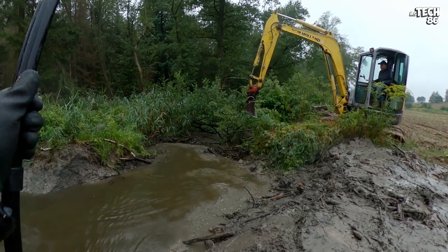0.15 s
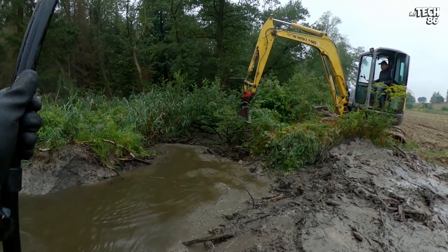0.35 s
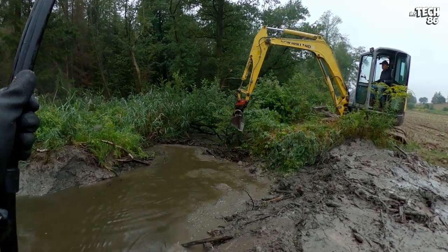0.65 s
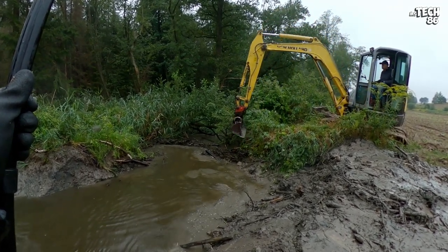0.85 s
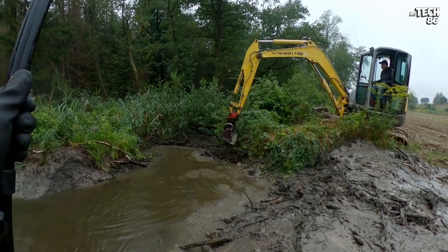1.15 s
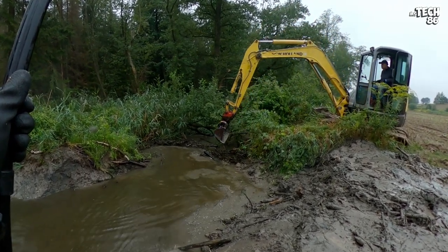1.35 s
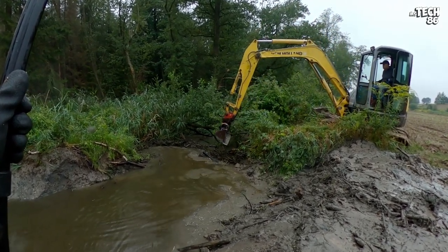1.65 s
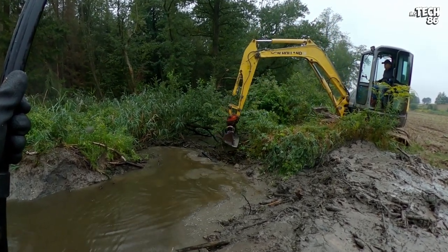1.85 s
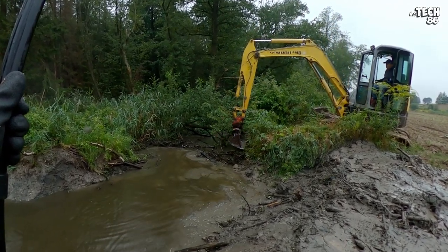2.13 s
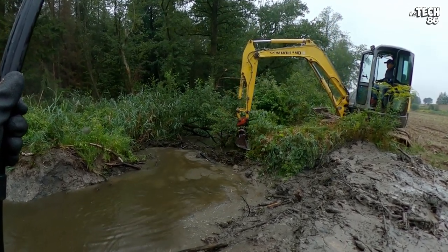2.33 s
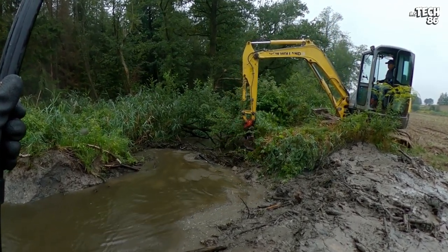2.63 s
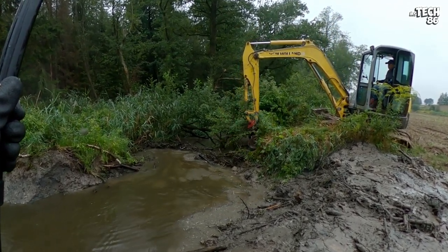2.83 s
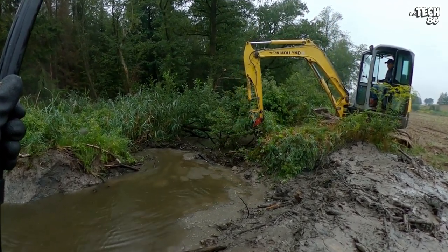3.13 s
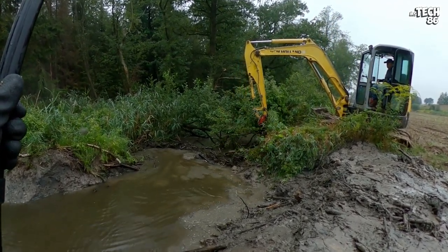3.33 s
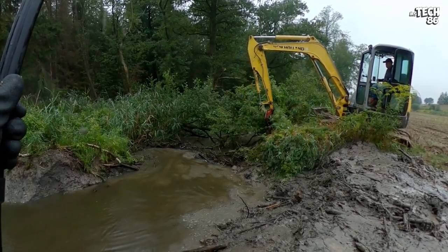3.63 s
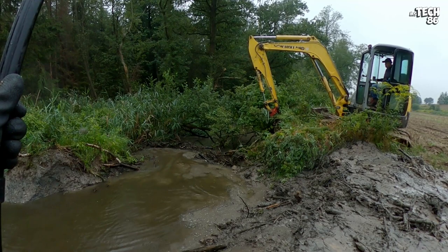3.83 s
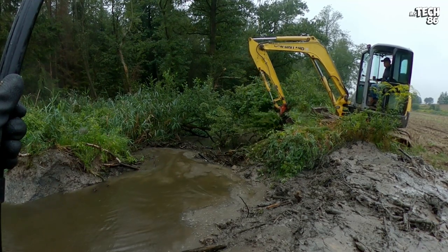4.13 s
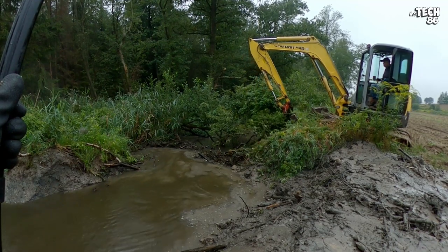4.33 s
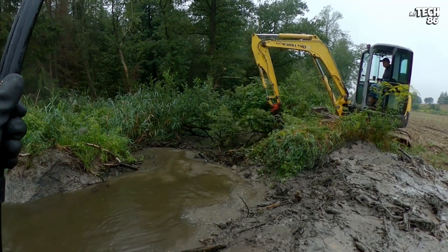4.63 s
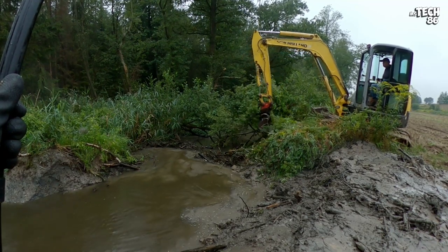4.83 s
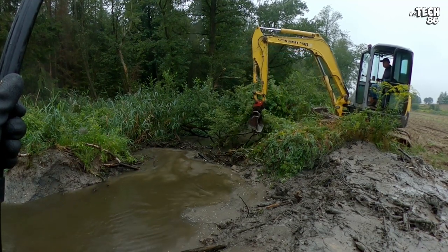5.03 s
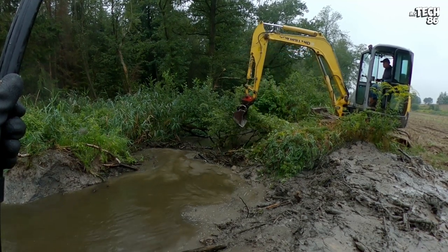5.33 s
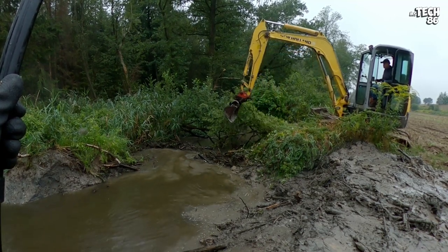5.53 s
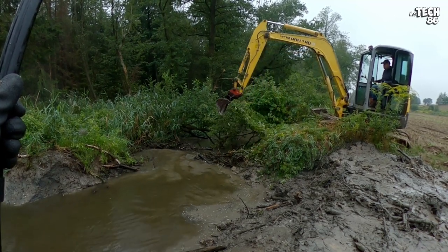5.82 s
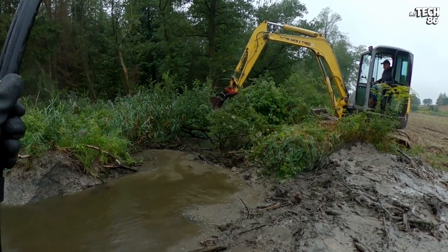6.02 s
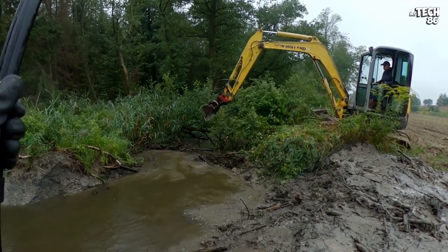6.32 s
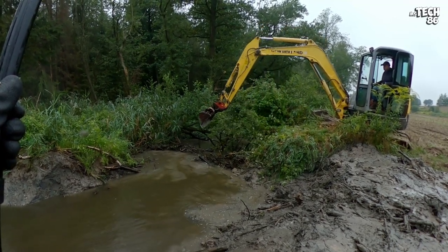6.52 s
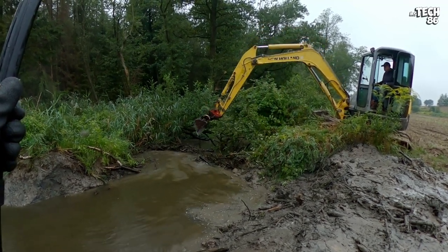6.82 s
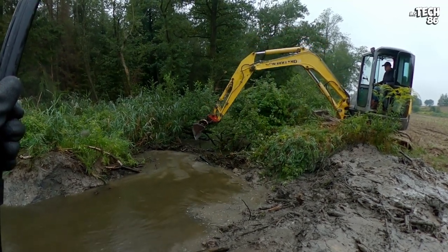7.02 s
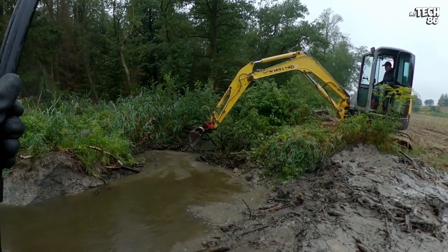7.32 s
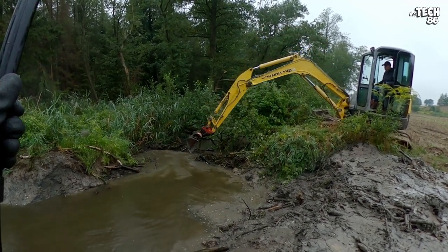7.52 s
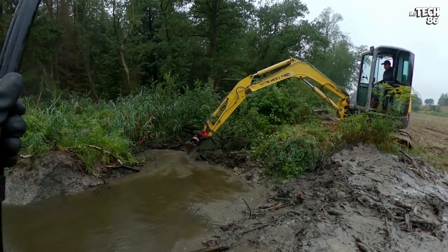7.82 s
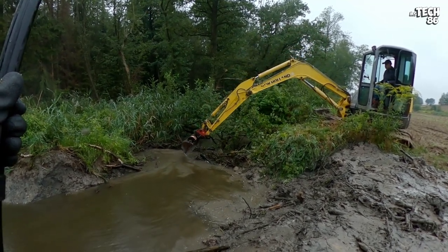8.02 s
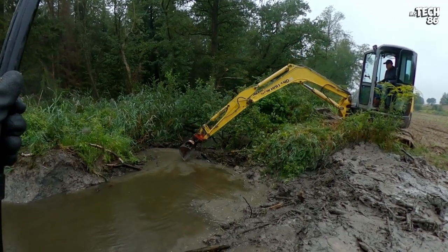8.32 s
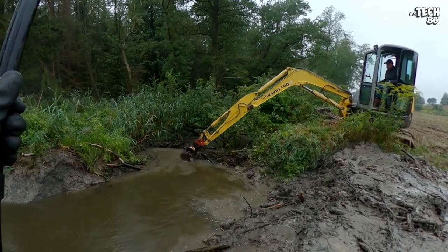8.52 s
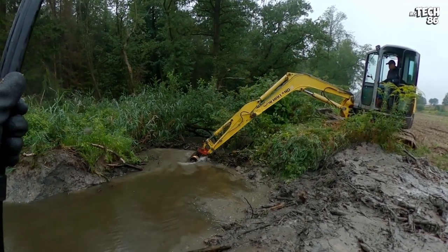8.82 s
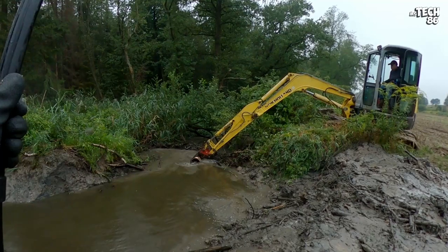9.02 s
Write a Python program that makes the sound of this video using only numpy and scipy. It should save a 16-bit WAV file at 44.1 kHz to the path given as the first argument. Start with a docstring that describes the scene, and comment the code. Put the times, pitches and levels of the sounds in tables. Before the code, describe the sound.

Outdoors on a muddy bank beside trees, a compact digger's diesel engine drones continuously with brief dips in speed. A fading metallic hum opens, then a dense run of hollow bucket knocks and bright branch snaps. Oil hiss and pump hum swell mid-way, followed by another hard clank group, sparse taps, one ringing clink, and a final rasp through roots. The microphone stands across the water at moderate distance; the stereo image is fairly narrow, with airy treble reflections.

```python
"""Edge of a wood by a muddy stream: a small diesel excavator digs at the bank.
Its four-cylinder engine drones at a firing rate that dips briefly; gear tones whine and throb.
Shaped noise gives the oil hiss in the valves, and sines the hum of the pump.
The steel bucket knocks in its pins (noise bursts into ringing modes), twigs snap in the brush,
a coupler clinks, and at last the bucket scrapes through soil and roots."""
import sys
import numpy as np
from scipy import signal
from scipy.fft import rfft, irfft, next_fast_len
from scipy.io import wavfile
from scipy.ndimage import uniform_filter1d

SR = 44100
rng = np.random.default_rng(int(sys.argv[2]) if len(sys.argv) > 2 else 0)


def log_audio(samples):
    """Write samples as a 16-bit WAV file to the path given in sys.argv[1]."""
    # one column per channel
    frames = np.atleast_2d(samples).T
    # limit to full scale, then quantise
    limited = np.clip(frames, -1, 1)
    pcm = np.round(limited * 32767).astype(np.int16)
    wavfile.write(sys.argv[1], SR, pcm)


N = 403956
TIME = np.arange(N) / SR
LEAK_DB = -54.5  # oil hiss with the valves shut


def from_db(db):
    """Amplitude ratio of a level in dB."""
    return np.exp(np.asarray(db) * np.log(10) / 20)


def rms_one(x):
    """Scales to rms 1."""
    return x / np.sqrt(np.mean(x ** 2) + 1e-20)


def in_time(rows):
    """Interpolates (time, level) rows to one level per sample."""
    s, level = np.transpose(rows)
    return np.interp(TIME, s, level)


def colour(x, outline):
    """Filters by a (Hz, dB) outline, falling away beyond its ends."""
    hz, db = np.transpose(outline)
    size = next_fast_len(N + 4096)
    f = np.maximum(np.fft.rfftfreq(size, 1 / SR), 1)
    skirts = np.minimum(f / hz[0], 1) ** 2 * np.minimum(hz[-1] / f, 1) ** 2
    gain = from_db(np.interp(np.log(f), np.log(hz), db)) * skirts
    return irfft(rfft(x, size) * gain, size)[:N]


def noise(outline):
    """Noise of rms 1, coloured by a (Hz, dB) outline."""
    return rms_one(colour(rng.standard_normal(N), outline))


def drift(rate_hz):
    """Random curve through rate_hz new normal values a second."""
    knots = rng.standard_normal(2 ** 15)
    return np.interp(TIME * rate_hz, np.arange(len(knots)), knots)


def resonance(x, hz, width_hz):
    """Two-pole resonance with gain 1 on top."""
    r = np.exp(-np.pi * width_hz / SR)
    zeros = np.array([1, 0, -1]) * (1 - r * r) / 2
    poles = [1, -2 * r * np.cos(2 * np.pi * hz / SR), r * r]
    return signal.lfilter(zeros, poles, x + 1e-18)


def double_resonance(x, hz, width_hz):
    """Two equal resonances in series, at rms 1."""
    return rms_one(resonance(resonance(x, hz, width_hz), hz, width_hz))


def bursts(times_s, levels_db, t60s, rise_s):
    """Envelope of blows that swell quickly and die away; their powers add."""
    power = np.zeros(N + SR)
    age = np.arange(SR) / SR
    for s, db, t60 in np.broadcast(times_s, levels_db, t60s):
        at = max(int(s * SR), 0)
        decay = from_db(db - 60 * age / max(t60, 1e-3))
        power[at:at + SR] += (decay * (1 - np.exp(-age / rise_s))) ** 2
    return np.sqrt(power[:N])


def swell(start_s, length_s):
    """A half sine that rises to 1 and falls back."""
    return np.sin(np.pi * np.clip((TIME - start_s) / length_s, 0, 1))


def throb(turns, depth, offset):
    """Level swing once per turn; rms 1."""
    return rms_one(np.exp(depth * np.cos(2 * np.pi * (turns - offset))))


def firing_rate():
    """Firings per second: a slow course with brief dips of the firing rate, each followed by a rise."""
    # course without the dips: (time [s], firing rate [Hz])
    course = [(0, 51.3), (.64, 50.6), (.81, 52.7), (1, 51.4), (2.46, 51.9), (3.2, 49.0), (3.87, 50.8),
              (4.35, 50.4), (4.43, 51.5), (5.3, 49.45), (6, 50.9), (6.1, 50.5), (9.16, 50.5)]
    # dips: (start [s], length [s], depth before smoothing [Hz])
    dips = [(.93, .15, 3.2), (1.11, .35, 2.5), (1.69, .26, 1.4), (4.54, .26, 1.5), (7.75, .29, 1.0),
            (8.43, .46, 3.1)]
    rise_per_s, rise_length_s = 1.85, .23  # share of the depth per second of dip; duration
    hz = in_time(course)
    for s, length, depth_hz in dips:
        rise = rise_per_s * length * swell(s + length, rise_length_s)
        hz = hz + depth_hz * (rise - swell(s, length))
    return uniform_filter1d(hz, size=SR // 16)  # the flywheel evens out the speed


def exhaust(firings, effort):
    """A clean drone at the firing rate, wavering overtones, and a rough puff at every firing."""
    # overtones: (multiple of firing rate [1], level relative to bark [dB])
    overtones = [(2, -0.5), (2.5, -15.5), (3, -2.5), (3.5, -13.5), (4, -12), (4.5, -24.5), (5, -16.5),
                 (6, -32), (7.5, -20), (8.5, -23), (9, -25), (10, -28.5), (11, -34), (12.5, -29), (15, -38),
                 (20, -33.5), (22.5, -31.5), (27.5, -52), (30, -37), (32.5, -36)]
    # puff colour: (frequency [Hz], relative level [dB])
    rumble = [(45, -4), (75, -5.5), (120, -5), (185, 0.5), (240, -3.5), (300, -14.5), (440, -14),
              (600, -26), (1000, -44)]
    # puff level: (time [s], level [dB])
    rumble_level = [(0, -24), (.3, -32.5), (.7, -27.5), (1.3, -34.5), (1.7, -25.5), (2.6, -32.5),
                    (5.5, -32), (6, -27), (7, -32), (8.3, -31), (8.8, -26)]
    # level at cruising speed, plus the change at full effort
    drone_db, bark_db = -22.9 + 1.7 * effort, -29 + 3 * effort
    drone = from_db(drone_db) * np.sqrt(2) * np.sin(2 * np.pi * firings)
    bark = 0
    for multiple, db in overtones:
        order = np.round(2 * multiple) / 2  # whole or half orders only
        tone = np.sin(2 * np.pi * (order * firings + rng.random()))
        bark = bark + from_db(db + 0.37 * drift(9)) * tone
    puffs = noise(rumble) * throb(firings, depth=0.33, offset=0.14)
    return drone + from_db(bark_db) * np.sqrt(2) * bark + from_db(in_time(rumble_level)) * puffs


def block(firings, hiss_db, repeat_db=-1.5):
    """Injectors and valves rattle; part of the pattern comes round again every four firings."""
    # rattle colour: (frequency [Hz], relative level [dB])
    clatter = [(300, 8.5), (500, 11), (800, 3), (1200, 3.5), (1900, 9), (2600, -0.5), (3500, -2),
               (4800, -22), (6300, -21), (8300, -23), (9700, -14.5), (14000, -64)]
    clatter_db = -44.5 + 0.1 * (hiss_db - LEAK_DB)  # a tenth of the oil hiss's swing
    cycle = rng.standard_normal(3500)
    repeating = rms_one(np.interp(firings / 4 % 1, np.linspace(0, 1, len(cycle)), cycle))
    rattle = from_db(repeat_db) * repeating + rng.standard_normal(N)
    rattle = rattle * throb(2 * firings, depth=0.27, offset=0.25)
    return from_db(clatter_db) * rms_one(colour(rattle, clatter))


def gears(firings, firing_hz, mesh_db=-0.5):
    """The casing favours gear tones near its pitch; the load swings once per engine cycle."""
    # whine: (time [s], level before the mesh_db trim [dB])
    whine_level = [(0, -45.5), (.55, -44.5), (2.85, -45.5), (3.05, -52), (5.3, -53.5), (6.5, -46),
                   (8.3, -45), (8.7, -50), (9, -43)]
    casing_hz, casing_width_hz = 1775, 41
    mesh = 0
    for order in range(32, 39):
        detuning = (order * firing_hz - casing_hz) / (casing_width_hz / 2)
        mesh = mesh + np.sqrt(2 / (1 + detuning ** 4)) * np.sin(2 * np.pi * order * firings)
    casing = .55 * double_resonance(rng.standard_normal(N), 1870, 380)
    swing = rms_one(1 + .65 * np.cos(2 * np.pi * (firings / 4 - .9)))
    return from_db(in_time(whine_level) + mesh_db) * swing * (mesh + casing)


def valves():
    """Hiss in dB: a valve opens quickly, pressure builds through the stroke, and the flow dies as it shuts."""
    # arm strokes: (opens [s], closes [s], hiss before pressure builds [dB])
    strokes = [(2.38, 4.38, -51), (4.727, 5.052, -49), (5.058, 5.62, -44), (8.55, 8.82, -46.5)]
    open_s, close_s, pressure_db_per_s = 0.049, 0.22, 3.5
    power = from_db(LEAK_DB) ** 2
    for opens, closes, db in strokes:
        held = np.clip(TIME - opens, 0, closes - opens)
        shut = np.maximum(TIME - closes, 0)
        flow = (1 - np.exp(-held / open_s)) * np.exp(-shut / close_s)
        power = power + (from_db(db + pressure_db_per_s * held) * flow) ** 2
    return 10 * np.log10(power)


def hydraulics(hiss_db):
    """Oil squeezes through the control valves as wavering, coloured noise."""
    # hiss colour: (frequency [Hz], relative level [dB])
    oil = [(900, -10), (2000, 5.5), (3300, 5), (4800, 0), (6400, 3.5), (8300, -6.5), (10000, -9),
           (12000, -24.5), (14000, -24), (16000, -44)]
    return from_db(hiss_db + 1.8 * drift(40)) * noise(oil)


def pump(firings, hiss_db):
    """The pump's pistons hum in step with the engine, as loud as the oil flow makes them."""
    # piston tones: (multiple of firing rate [1], level relative to hiss [dB])
    piston_tones = [(10, -5), (20, -9)]
    out = 0
    for order, db in piston_tones:
        tone = np.sin(2 * np.pi * np.round(order) * firings)
        out = out + from_db(hiss_db + db + 1.5 * drift(4.5)) * tone
    return out


def arm_hum():
    """The arm still hums from an earlier blow: a few modes fade out."""
    # arm modes: (frequency [Hz], level at the start [dB], t60 [s])
    hum_modes = [(261, -22.5, 1.0), (481.3, -33, .6), (815, -37.5, 0.18), (1248, -37, 0.24)]
    out = 0
    for hz, db, t60 in hum_modes:
        out = out + from_db(db - 60 * np.minimum(TIME / t60, 3)) * np.sin(2 * np.pi * hz * TIME)
    return out


def twigs():
    """Each break is a brief, bright crack of splintering fibres; small stems tick and leaves rustle."""
    # twigs and roots snapping: (time [s], burst level [dB], pitch [Hz])
    snaps = [(0.204, -39, 5900), (.399, -36, 5170), (.729, -17, 5700), (1.435, -18.5, 3750),
             (1.768, -16, 4130), (2.785, -24.5, 6400), (2.81, -29.5, 6090), (3.437, -25, 3430),
             (4.806, -23, 3730), (5.110, -25.5, 6560), (5.177, -22, 5870), (5.57, -30.5, 3500),
             (8.159, -33, 6350), (8.827, -14, 3640), (8.890, -39, 3570)]
    ticks_per_s, tick_db, tick_spread_db = 2.6, -51, 0.5  # small stems giving way
    fibres = noise([(1500, 18.0), (3000, 12.5), (7000, 4.5), (10500, -4.5), (15000, -24)])
    fibres = fibres * from_db(3.5 * drift(900))
    # a bush springs back
    out = bursts([0.706], -39.5, 0.68, rise_s=.008) * double_resonance(fibres, 6000, 2500)
    for s, db, hz in snaps:
        out += bursts(s, db, 0.05, rise_s=0.001) * rms_one(resonance(fibres, hz, 3600))
    times = np.cumsum(rng.exponential(1, size=64)) / ticks_per_s
    times = times[times < TIME[-1]]
    levels_db = tick_db + tick_spread_db * rng.standard_normal(len(times))
    ticks = bursts(times, levels_db, .025, rise_s=.001)
    return out + ticks * rms_one(resonance(fibres, 7500, 3000))


def own_rings(times_s, levels_db, pitches_hz, t60_s=0.074):
    """Each blow lands on another spot and favours a ring of its own: narrow-band decaying noise."""
    out = np.zeros(N + SR)
    age = np.arange(SR // 2) / SR
    for at, db, hz in zip((times_s * SR).astype(int), levels_db, pitches_hz):
        narrow = resonance(rng.standard_normal(len(age)), hz, 0.13 * hz)
        ring = rms_one(resonance(narrow, hz, 0.51 * hz))
        out[at:at + len(age)] += ring * from_db(db - 60 * age / t60_s) * (1 - np.exp(-age / 0.0013))
    return out[:N]


def bucket(contact_db=-2.2, ring_db=5.5, chatter_db=3.5):
    """Loose pins chatter at each blow; lows last longer, and contact noise excites the steel's modes."""
    # knocks: (time [s], clang [dB], crack [dB], strongest ring [Hz]), levels before contact_db
    knocks = [(.714, -15, -25, 3200), (.728, -30, -36, 1650), (.849, -16, -16, 2930),
              (.908, -12, -19, 2150), (.944, -18, -25.5, 2240), (.964, -16.5, -41, 846),
              (1.048, -20.5, -34, 1910), (1.157, -21, -55, 1020), (1.225, -19.5, -57, 2100),
              (1.391, -14.5, -29, 1590), (1.418, -16, -21.5, 2430), (1.436, -17.5, -22.5, 714),
              (1.548, -16, -16.5, 1660), (1.588, -20.5, -40, 1900), (1.612, -15, -22, 680),
              (1.742, -21, -27, 1940), (1.757, -13.5, -17.5, 910), (1.884, -27, -30, 1130),
              (1.973, -13, -25.5, 1760), (1.991, -19.5, -32, 770), (2.176, -29.5, -47, 2300),
              (2.772, -24.5, -30, 2300), (3.147, -31.5, -47, 740), (3.354, -31, -41, 703),
              (4.354, -19, -28, 1210), (4.376, -14, -15, 2840), (4.406, -11.5, -15, 1880),
              (4.567, -21, -25, 2200), (4.78, -19.5, -26, 1320), (4.962, -22.5, -24.5, 3100),
              (5.091, -28.5, -31.5, 1310), (5.878, -22.5, -34, 2780), (6.756, -29.5, -55, 1090),
              (7.927, -28.5, -50, 1570), (8.462, -25.5, -33.5, 690), (8.499, -23, -42, 840),
              (8.765, -27.5, -29, 2390), (8.824, -18, -21, 2870), (8.911, -26, -28.5, 1420)]
    # bucket and arm modes: (frequency [Hz], gain before ring_db [dB], t60 [s])
    steel_modes = [(203.1, 5.5, 0.2), (240, -10, 0.53), (320.4, -7, 0.28), (363, 1, 0.5), (451, -13, 0.41),
                   (488, -5.5, 0.43), (686, -3.5, 0.16), (775, -1.5, 0.42), (947, -1, 1), (1032, 1.5, 0.28),
                   (1186, -1, 0.82), (1444, -13, 0.1), (1566, -10, 0.12), (1770, 3, 0.24),
                   (2200, -32, 0.29), (2320, -12, 0.18), (2760, -10, 0.11), (2900, 0.5, 0.041),
                   (3660, -19, 0.14), (3780, -8, 0.06), (4350, -12, 0.13)]
    # contact colours, each: (frequency [Hz], relative level [dB])
    thud_colour = [(120, -1), (200, 4), (300, 5), (460, 9), (700, -15), (1100, -10)]
    clang_colour = [(450, 7), (800, 9), (1200, 4.5), (1800, 6.5), (2700, -2.5), (3600, -14.5), (5000, -51)]
    crack_colour = [(2200, 13.5), (3600, 12), (5000, -0.5), (6800, -2.5), (8500, -16.5), (10500, -22),
                    (12500, -63), (16000, -38)]
    thud_db, own_ring_db = -1.5, -4.5  # relative to the clang
    light_tap_db, thud_loss_per_db = -25, 3  # lighter taps hardly shake the arm
    rebound_within_s, rebound_thud_db = .03, -4.5  # a rebound has less weight behind it
    lead_s, lead_db = 0.0094, -8  # a fainter touch 9 ms before each blow softens its onset

    s, clang_db, crack_db, ring_hz = np.transpose(knocks)
    thud_db = clang_db + thud_db - thud_loss_per_db * np.maximum(light_tap_db - clang_db, 0)
    thud_db = thud_db + rebound_thud_db * (np.diff(s, prepend=0) < rebound_within_s)
    touches, touch_db = np.r_[s, s - lead_s], np.r_[clang_db, clang_db + lead_db]
    chatter = rms_one(from_db(chatter_db * drift(450)))
    thud = bursts(s, thud_db, .25, rise_s=0.0041) * noise(thud_colour)
    clang = bursts(touches, touch_db, 0.13, rise_s=0.0068) * noise(clang_colour) * chatter
    crack = bursts(s, crack_db, 0.087, rise_s=0.002) * noise(crack_colour) * chatter
    contact = thud + clang + crack
    rings = 0
    for k, (hz, db, t60) in enumerate(steel_modes):
        share = from_db(db + 1.06 * drift(4.4))  # mode weights wander from blow to blow
        width_hz = np.log(1000) / (np.pi * t60)
        rings = rings + resonance(contact * share, hz, width_hz) * (-1) ** k
    spot_rings = own_rings(s, clang_db + own_ring_db, ring_hz)
    return from_db(contact_db) * contact + from_db(ring_db) * rings + spot_rings


def coupler(ring_db=-2.5):
    """The coupler clinks against its stop: a short steel chatter that leaves a clear ring."""
    # clinks: (time [s], burst level [dB])
    clinks = [(6.265, -17.5), (6.279, -22), (6.298, -30)]
    # contact colour: (frequency [Hz], relative level [dB])
    clink_colour = [(500, -13), (1100, -10), (1450, 2.5), (1900, -8), (2600, -6), (3300, -13),
                    (4300, -21.5), (7000, -41)]
    # modes: (frequency [Hz], level relative to clink before ring_db [dB], t60 before t60_scale [s])
    coupler_modes = [(670, -18, 0.39), (750, -21, 0.65), (1251, -14, 0.36), (1586, 2, 0.16),
                     (2224, -10, 0.14), (2570, -8, 0.17), (2930, -10, 0.1)]
    t60_scale = 0.81
    s, db = np.transpose(clinks)
    contact = bursts(s, db, 0.095, rise_s=0.0017) * noise(clink_colour)
    rings = 0
    for hz, mode_db, t60 in coupler_modes:
        tone = np.sin(2 * np.pi * (hz * TIME + rng.random()))
        rings = rings + bursts(s, db + mode_db, t60_scale * t60, rise_s=0.0022) * tone
    return contact + from_db(ring_db) * rings


def scrape(grain_db=1.0):
    """Soil and roots tear in uneven grains, and the steel rasps over them in narrow, rough bands."""
    # bucket dragging: (time [s], level [dB])
    drag_level = [(8.42, -64), (8.5, -46), (8.58, -39.5), (8.7, -37.5), (8.8, -44), (8.9, -58), (9.0, -73)]
    # soil colour: (frequency [Hz], relative level [dB])
    soil = [(300, -5), (900, -4), (2000, 3), (2600, 2), (4200, 1), (6500, -6.5), (10000, -17), (15000, -52)]
    # steel rasping over roots: (start [s], length [s], pitch [Hz], level [dB])
    squeaks = [(8.565, 0.045, 2450, -35), (8.565, 0.027, 4050, -36), (9.2, 0.26, 2290, -42.5),
               (8.69, .092, 4100, -42)]
    dragging = (TIME > drag_level[0][0]) & (TIME < drag_level[-1][0])
    out = dragging * from_db(in_time(drag_level) + grain_db * drift(150)) * noise(soil)
    slips = rng.standard_normal(N)
    for s, length, hz, db in squeaks:
        rasp = rms_one(resonance(resonance(slips, hz, .07 * hz), hz, .6 * hz))
        out += from_db(db) * swell(s, length) * rasp
    return out


def woods(x, t60_s=0.38, dull_hz=3200):
    """Trunks and leaves scatter a dull tail: decaying, low-passed noise as an echo."""
    age = np.arange(SR) / SR
    scatter = rng.standard_normal(SR) * from_db(-60 * age / t60_s) * (1 - np.exp(-age / 0.004))
    scatter = scatter / np.sqrt(np.sum(scatter ** 2))
    scatter = signal.sosfilt(signal.butter(2, dull_hz, fs=SR, output="sos"), scatter)
    return signal.fftconvolve(x, scatter)[:N]


def reflections(x):
    """A dense cluster of short echoes from the ground and the brush."""
    age = np.arange(SR // 12) / SR
    scatter = rng.standard_normal(len(age)) * np.exp(-age / .012) * (age > .001)
    return signal.fftconvolve(x, scatter / np.sqrt(np.sum(scatter ** 2)))[:N]


def spread(x):
    """Reflections ripple the treble and differ between the sides; the machine stands a little right."""
    # reflections from the wet bank: (frequency [Hz], gain [dB])
    bank = [(1500, -57), (2600, -11.5), (5000, -15.5), (14000, -9)]
    # side filter: (frequency [Hz], gain [dB])
    width = [(50, -64), (125, -69), (250, -60), (500, -50.5), (1000, -25.5), (2000, -12.5), (4000, -12),
             (8000, -6), (12000, -6.5)]
    mid = x + colour(reflections(x), bank)
    side = colour(reflections(x) - .25 * x, width)
    return np.array([mid + side, mid - side])


def scene():
    """The firing rate drives exhaust, block, gears and pump; the digging sounds over them."""
    cruise_hz, full_effort_drop_hz = 50.5, 2.0
    firing_hz, hiss_db = firing_rate(), valves()
    effort = np.tanh((cruise_hz - firing_hz) / full_effort_drop_hz)  # -1 fast to 1 slow
    firings = np.cumsum(firing_hz) / SR
    machine = exhaust(firings, effort) + block(firings, hiss_db) + gears(firings, firing_hz)
    machine = machine + hydraulics(hiss_db) + pump(firings, hiss_db)
    digging = arm_hum() + twigs() + bucket() + coupler() + scrape()
    return spread(machine + digging + from_db(-6.5) * woods(digging))


def record(dry):
    """A steep elliptic low-pass cuts the top."""
    cutoff_hz = 15700
    return signal.sosfilt(signal.ellip(10, .1, 90, cutoff_hz, fs=SR, output="sos"), dry)


dry = scene()
out = record(dry)
log_audio(out)
```